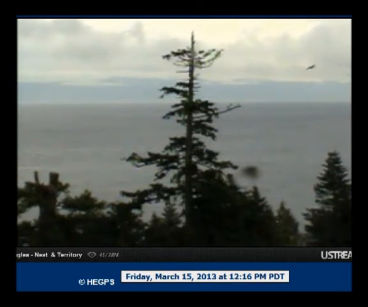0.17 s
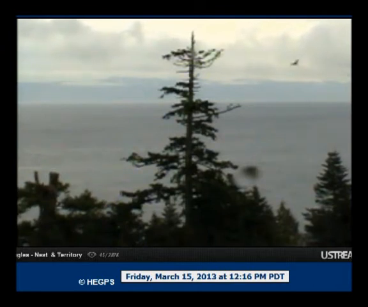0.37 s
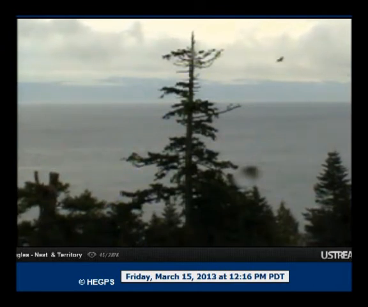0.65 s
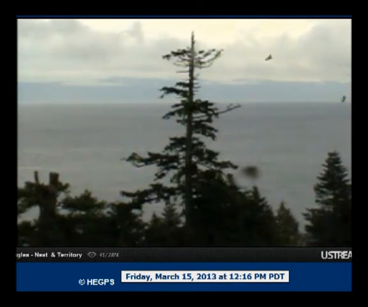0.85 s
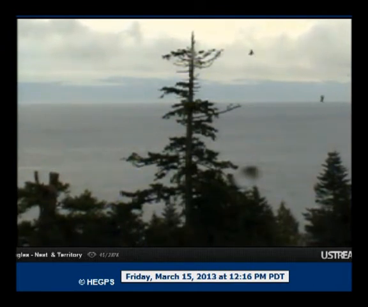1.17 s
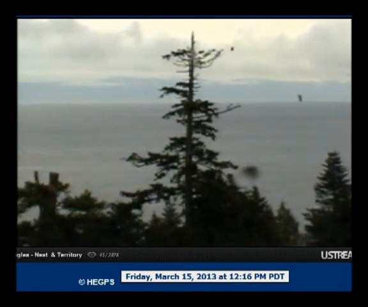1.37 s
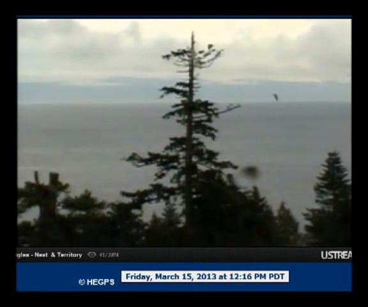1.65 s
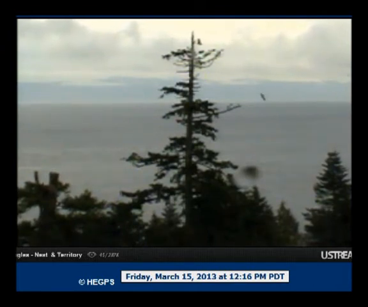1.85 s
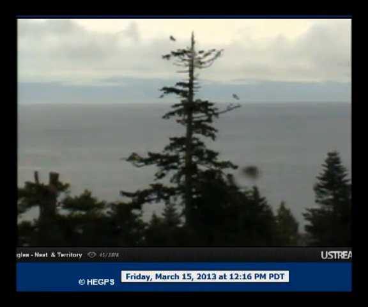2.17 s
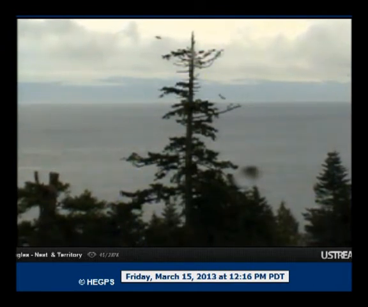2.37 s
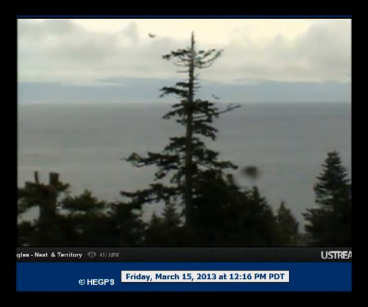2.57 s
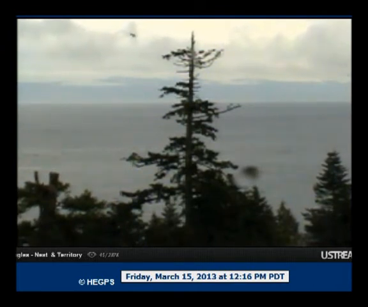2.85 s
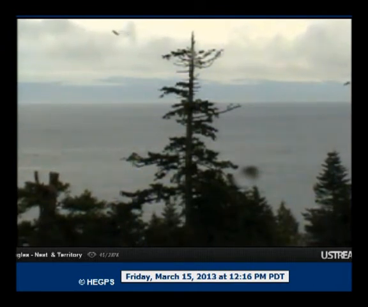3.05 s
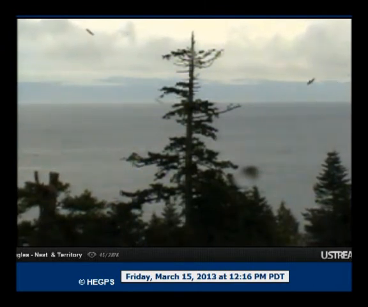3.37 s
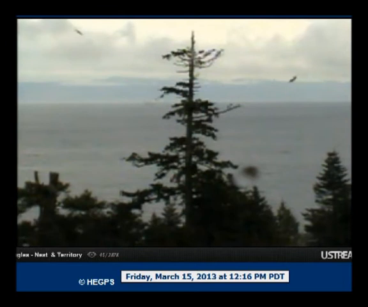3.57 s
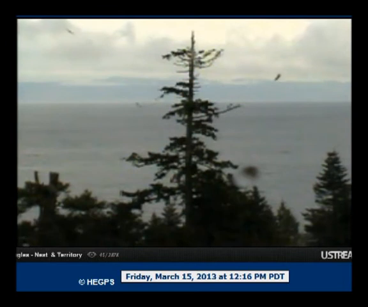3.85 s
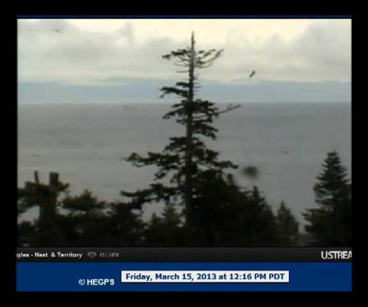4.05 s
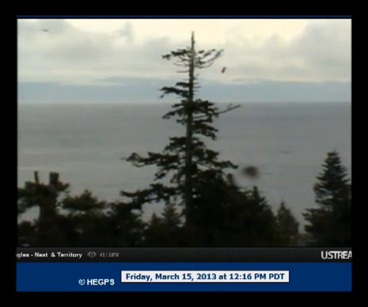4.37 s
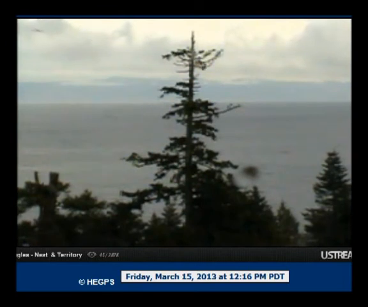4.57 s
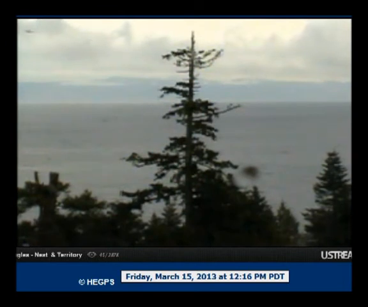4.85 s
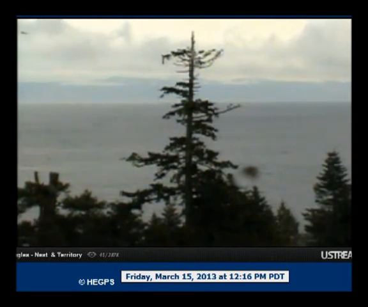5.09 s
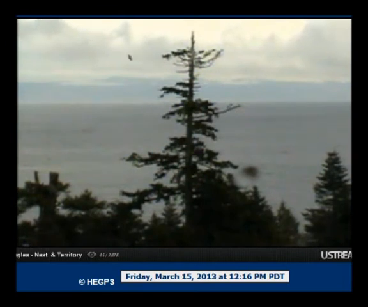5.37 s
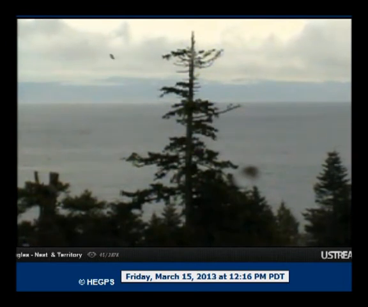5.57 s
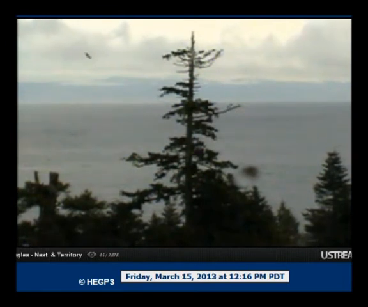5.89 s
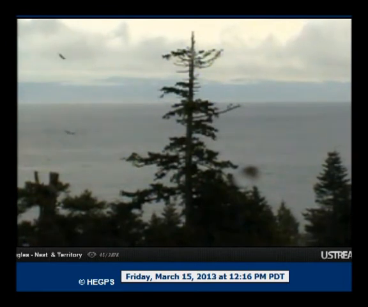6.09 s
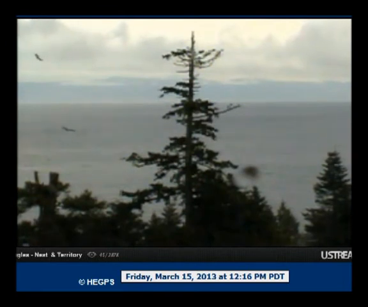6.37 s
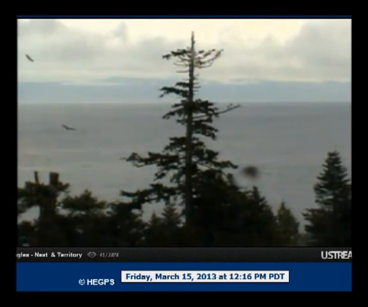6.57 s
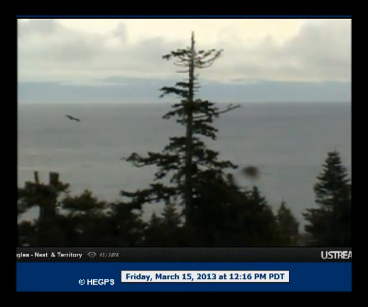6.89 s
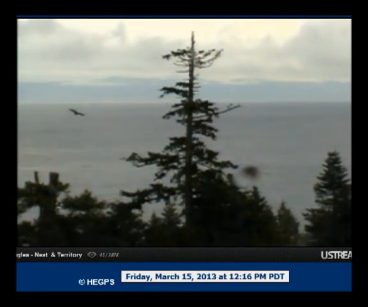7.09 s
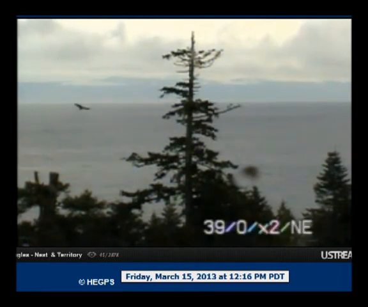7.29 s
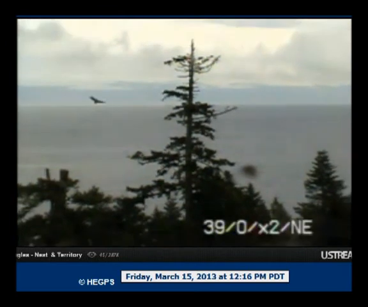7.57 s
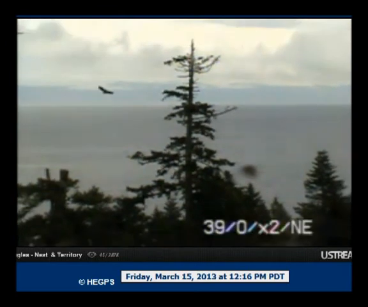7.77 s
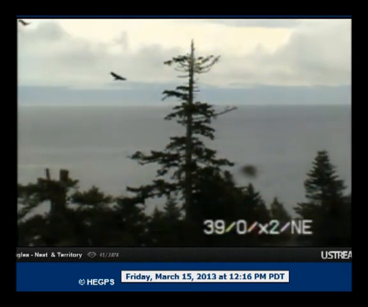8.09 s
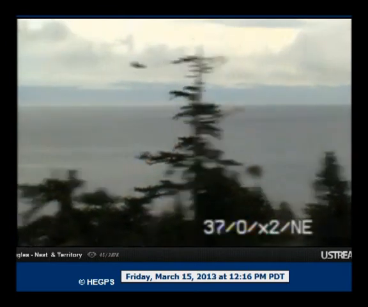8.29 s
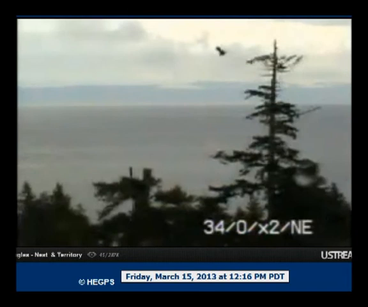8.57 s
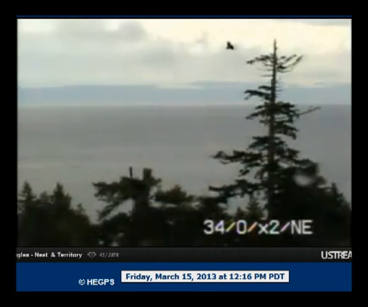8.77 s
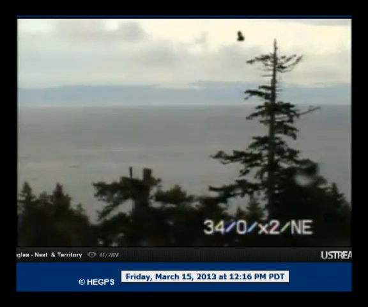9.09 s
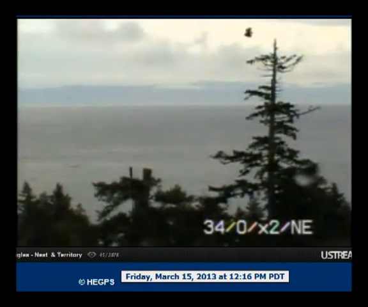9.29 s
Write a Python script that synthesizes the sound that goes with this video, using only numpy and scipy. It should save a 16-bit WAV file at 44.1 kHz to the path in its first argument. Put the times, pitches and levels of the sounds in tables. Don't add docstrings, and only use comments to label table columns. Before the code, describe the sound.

For the first three seconds there is only wind: a deep, fluttering boom in the camera housing, overloading the microphone, with surf and a rush in the trees that puffs up between 1 and 2 seconds. A very faint mains buzz lies beneath. From about 3 seconds eagles chatter in very short, high, nearly pure piped notes, mixed with yelps that scoop up, hold and crack downward. They are fairly faint at first, then stronger from 5 seconds, with loud notes near 5.9 and 6.9 and weak echoes off trunks. Wind buffeting peaks around 7 seconds, when the calls thin out. Near 8.2 a small motor whines, climbs in pitch and stops with a clunk at 8.7. Dense lower chirps follow until 9.4, over a faint, arched distant bird wail. The sound is gritty, with metallic mirrored tones and dull treble.

```python
import sys
import numpy as np
from scipy import signal
from scipy.fft import rfft, irfft, next_fast_len
from scipy.io import wavfile
from scipy.ndimage import uniform_filter1d

SR = 44100
rng = np.random.default_rng(int(sys.argv[2]) if len(sys.argv) > 2 else 0)


def put_to_file(sound):
    columns = np.atleast_2d(sound).T
    safe = np.clip(columns, -1, 1)
    whole_steps = np.round(safe * 32767)
    wavfile.write(sys.argv[1], SR, whole_steps.astype(np.int16))


def gain_from_db(level_db):
    decades = np.asarray(level_db, float) / 20
    return 10 ** decades


N = 415863
SURF_DB = -47.5


def rms_one(x):
    return x / np.sqrt(np.mean(x ** 2) + 1e-20)


def in_time(rows):
    s, *columns = np.transpose(rows)
    t = np.arange(N) / SR
    gate = (t >= s[0]) & (t <= s[-1])
    return [gate] + [np.interp(t, s, column) for column in columns]


def colour(x, points):
    size = next_fast_len(N)
    hz = np.arange(1, size // 2 + 2) * SR / size
    point_hz, point_db = np.transpose(points)
    gain_db = np.interp(np.log(hz), np.log(point_hz), point_db)
    return irfft(rfft(x, size) * gain_from_db(gain_db), size)[:N]


def drift(rate_hz):
    steps = rng.standard_normal(int(N / SR * 400) + 2)
    return rms_one(np.interp(np.arange(N) * rate_hz / SR, np.arange(len(steps)), steps))


def resonance(x, hz, width_hz):
    r = np.exp(-np.pi * width_hz / SR)
    poles = [1, -2 * r * np.cos(2 * np.pi * hz / SR), r * r]
    return signal.lfilter(np.array([1, 0, -1]) * (1 - r * r) / 2, poles, x)


def band(x, edges_hz):
    return signal.sosfilt(signal.butter(2, edges_hz, "band", fs=SR, output="sos"), x)


def whistle(hz, wobble):
    return 2 * np.pi * np.cumsum(hz * (1 + wobble * drift(60))) / SR


def eagle_notes():
    # centre t/s, peak level/dB, f/Hz,
    # glide/Hz, length/ms
    pipes = [(3.166, -47, 3500, -450, 14), (3.351, -37, 3800, -247, 11), (3.656, -36.5, 3738, -11.5, 25),
             (3.847, -38, 3530, -400, 15), (4.413, -41, 3922, -69, 15), (4.988, -34, 3600, 99, 12),
             (5.22, -29.5, 2984, 71, 19), (5.675, -43, 3340, -31, 13), (5.878, -24, 3660, -74, 17),
             (6.503, -46, 3860, -4, 14), (6.753, -43.5, 3410, -498, 15), (6.874, -21.5, 3110, 254, 30),
             (7.953, -50, 3491, -89, 8), (8.405, -26.5, 3125, 34, 23), (8.507, -29.5, 2930, -277, 9.8),
             (8.852, -44, 3124, 212, 14), (8.875, -33.5, 3375, -131, 17), (8.95, -46, 3410, -11, 110),
             (9.071, -30.5, 3620, -40, 18), (9.086, -29, 3430, -56, 19), (9.181, -30.5, 3490, -57, 18),
             (9.291, -28, 2970, -298, 16), (4.318, -49, 3400, -150, 10)]
    # centre t/s, peak level/dB, f/Hz, length/ms, level after the break/dB
    yelps = [(3.042, -39, 3937, 40, -47), (3.251, -48, 3900, 32, -46.5), (3.751, -36, 3800, 22, -41),
             (4.198, -38.5, 3935, 46, -47), (4.551, -37, 3839, 26, -40), (4.970, -27, 3725, 11, -27),
             (5.082, -32.5, 3700, 13, -24), (5.776, -32.5, 3807, 23, -40), (5.969, -30.5, 3620, 9.8, -42.5),
             (6.411, -39, 3980, 14, -29), (6.525, -42.5, 4020, 22, -33.5), (6.623, -40.5, 3890, 36, -40),
             (7.001, -31.5, 3790, 24, -32), (7.121, -28.5, 3740, 14, -43), (7.830, -36.5, 3905, 39, -50),
             (8.051, -40, 3920, 31, -43), (8.17, -44.5, 3900, 31, -42.5), (8.290, -33, 3890, 11, -29.5),
             (9.407, -28.5, 3195, 12, -28)]
    scoop_pitch, scoop_rise_hz, scoop_ms = .81, 350, 9
    break_pitch, break_ms, break_late_ms = .865, 15, 6.8
    rows = list(pipes)
    for s, db, hz, ms, low_db in yelps:
        half_s = ms / 2 / 1000
        scoop_db = min(db - 3.5, -41.5)
        low_glide_hz = 60 + 20.5 * (low_db + 28.5)
        rows.append((s - half_s, scoop_db, scoop_pitch * hz, scoop_rise_hz, scoop_ms))
        rows.append((s, db, hz, -79.5, ms))
        rows.append((s + half_s + break_late_ms / 1000, low_db, break_pitch * hz, low_glide_hz, break_ms))
    return rows


def eagles():
    # lag t/s, level/dB
    trunks = [(.027, -26.5), (.05, -24.5), (.074, -25.5), (.11, -25.5)]
    calls, waver = np.zeros(N + SR), drift(200)
    flutter = gain_from_db(4.5 * np.minimum(drift(260), .6))
    rasp = drift(390) * np.cos(2 * np.pi * 280 * np.arange(N) / SR)
    for s, db, hz, glide_hz, ms in eagle_notes():
        size = int(1.3 * ms * SR / 1000)
        start = int(s * SR - .45 * size)
        u = np.linspace(0, 1, size)
        here = np.minimum(np.arange(start, start + size), N - 1)
        pitch_hz = (hz + 1.3 * glide_hz * (u - .45)) * (1 + .01 * waver[here])
        phase = 2 * np.pi * np.cumsum(pitch_hz) / SR
        swell = np.sin(np.pi * u ** .64) * flutter[here]
        tone = np.sin(phase) + gain_from_db(-37) * np.sin(2 * phase)
        hoarse = 1 + 1.3 * max(hz - 3400, 0) / 1000 * rasp[here]
        calls[start:start + size] += gain_from_db(db - 0.5) * swell * tone * hoarse
    lag = np.arange(SR // 2) / SR
    scatter = rng.standard_normal(len(lag)) * gain_from_db(-60 * lag / .8) * (lag > .012)
    echoes = signal.fftconvolve(calls, scatter / np.sqrt(np.sum(scatter ** 2)))
    near = sum(gain_from_db(db) * np.roll(calls, int(s * SR)) for s, db in trunks)
    return calls[:N] + flutter * (gain_from_db(-20.5) * echoes[:N] + near[:N])


def gusts():
    # peak t/s, level over the surf/dB, fall/s
    gust_table = [
        (.2, -1.5, 0.31),
        (1.05, 1, .3),
        (1.37, 4, 0.12),
        (1.62, 2, 0.087),
        (1.97, 3.5, 0.12),
        (2.57, 0.5, 0.1),
        (5.51, 2, 0.049),
        (6.9, 0.5, 0.28),
        (9.2, 0, 0.12),
    ]
    t, rush_db = np.arange(N) / SR, np.full(N, float(SURF_DB))
    for s, db, fall in gust_table:
        spread = np.where(t < s, 0.38 * fall, fall)
        rush_db += db * np.exp(-((t - s) / spread) ** 2)
    return rush_db


def wind():
    # t/s, buffeting level/dB
    pressure = [(0, -29), (.5, -28.5), (1.2, -29.5), (2.5, -27), (3.3, -31.5), (4.4, -25), (4.8, -27),
                (5.2, -22), (6.3, -25.5), (6.7, -22.5), (7.15, -19.5), (7.5, -27), (8.6, -30.5), (9.2, -26),
                (9.43, -26)]
    # f/Hz, width/Hz, level/dB
    housing = [(55.5, 23.7, -6), (83.26, 8.3, -6), (126.82, 13.37, 4.5), (148.6, 8.2, -9.5),
               (196.1, 14.8, -11), (264.5, 19.3, -13.5), (336.5, 34.9, -11), (399, 10, -29.5),
               (581.6, 43.6, -22), (813.5, 70, -29), (1050, 68, -34)]
    # f/Hz, level per Hz/dB
    rush_colour = [(150, 6.5), (400, -4.5), (700, -4), (1400, -8), (2000, -15), (2500, -19), (3000, -24.5),
                   (3600, -33.5), (3900, -51.5), (6000, -55.5), (9000, -62.5)]
    _, buffet_db = in_time(pressure)
    boom_db = -18 - 0.039 * (buffet_db - buffet_db.mean())
    rush_db = gusts()
    air = rng.standard_normal((len(housing) + 2, N + SR))
    boom = np.zeros(N + SR)
    for a, (hz, width_hz, db) in zip(air, housing):
        boom += gain_from_db(db) * resonance(resonance(a, hz, width_hz), hz, 6 * width_hz)
    boom = gain_from_db(boom_db + 3.0) * rms_one(boom[SR:])
    buffet = gain_from_db(buffet_db + 0.5) * rms_one(band(air[-1], [14, 70])[SR:])
    rush = colour(air[-2, :N], rush_colour) * gain_from_db(0.56 * drift(12))
    leaves = band(rush, (1300, 2400))
    rush = rush + (gain_from_db(1.3 * (rush_db - SURF_DB)) - 1) * leaves
    return boom + buffet + gain_from_db(.6 * rush_db - 4.0) * rms_one(rush)


def motor():
    # t/s, f/Hz, level/dB
    pan = [
        (8.22, 1175, -60),
        (8.26, 1187, -40),
        (8.3, 1195, -56),
        (8.34, 1198, -43.5),
        (8.42, 1187, -60),
        (8.49, 1228, -38.5),
        (8.64, 1302, -30),
        (8.665, 1340, -45),
        (8.675, 1305, -47),
    ]
    stop_s, stop_db = 8.685, -27.5
    gate, hz, db = in_time(pan)
    whine = gate * gain_from_db(db + 2.5) * np.sin(whistle(hz, wobble=.003))
    since = np.arange(N) / SR - stop_s
    knock = rng.standard_normal(N) * (since > 0) * np.exp(-np.abs(since) / 0.018)
    gearbox = resonance(resonance(knock, 1200, 500), 1200, 500)
    return whine + gain_from_db(stop_db) * 6 * gearbox


def far_birds():
    # t/s, f/Hz, fundamental level/dB, octave level/dB
    wail_arch = [(9.0, 1200, -55, -68), (9.038, 1300, -39, -63), (9.105, 1385, -45, -52),
                 (9.16, 1450, -46, -61), (9.24, 1485, -50, -57), (9.3, 1490, -49, -60),
                 (9.328, 1470, -46, -46), (9.352, 1300, -42, -45), (9.39, 1200, -54, -66)]
    # t/s, f/Hz, level/dB
    answer_arch = [(9.13, 2330, -66), (9.16, 2390, -55), (9.24, 2400, -57), (9.28, 2310, -51),
                   (9.325, 2150, -51), (9.35, 2050, -68)]
    gate, hz, db, octave_db = in_time(wail_arch)
    phase = whistle(hz, wobble=0.0031)
    wail = gate * (gain_from_db(db) * np.sin(phase) + gain_from_db(octave_db) * np.sin(2 * phase))
    gate, hz, db = in_time(answer_arch)
    answer = gate * gain_from_db(db) * np.sin(whistle(hz, wobble=0.0025))
    shimmer = gain_from_db(2.5 + 2 * drift(30))
    return shimmer * (wail + answer)


def mains_buzz():
    mains_hz = 60
    spikes = np.zeros(N)
    at = (np.arange(0, N / SR, .5 / mains_hz) * SR).astype(int)
    spikes[at] = (-1.) ** np.arange(len(at))
    return gain_from_db(-62) * rms_one(resonance(resonance(spikes, 2900, 1400), 2900, 1400))


def scene():
    return (eagles() + wind() + motor() + far_birds() + mains_buzz())[None]


def overload(x):
    ceiling, knee, give = .3, .234, .17
    x = np.minimum(x, ceiling)
    return np.maximum(x, give * (x + knee) - knee)


def unsteady_clock(x):
    # f/Hz, timing error level in samples/dB, f above which its mirror fades/Hz
    wobbles = [(3900, -10, 9000), (7800, -14.5, 2200)]
    t, slope = np.arange(N) / SR, np.gradient(x)
    for hz, db, fade_hz in wobbles:
        dull = signal.sosfilt(signal.butter(3, fade_hz, fs=SR, output="sos"), slope)
        x = x + gain_from_db(db) * np.cos(2 * np.pi * hz * t) * dull
    return x


def patchy_treble(x):
    # f/Hz, level over its usual level/dB
    shut_under = [(4400, -7), (8600, -6), (9100, -1), (9600, 3), (9900, 11), (12000, 23), (12500, 60)]
    hz, _, z = signal.stft(x, SR, nperseg=1024)
    power = uniform_filter1d(np.abs(z) ** 2, size=9, axis=0)
    power = power[4::9].repeat(9, axis=0)[:len(hz)]
    limit = np.median(power, axis=1) * gain_from_db(2 * np.interp(hz, *np.transpose(shut_under), left=-90))
    masked = gain_from_db(2 * -27) * ((hz > 4400) & (hz < 5800))
    high = np.max(power[(hz > 3550) & (hz < 4200)], axis=0)
    ahead = np.maximum(high, np.roll(high, -2) * gain_from_db(-4))
    note_power = np.max(power[(hz > 2700) & (hz < 4200)], axis=0)
    grit = rng.standard_normal(z.shape) + 1j * rng.standard_normal(z.shape)
    z = z + gain_from_db(-20.5) * np.outer((hz > 2800) & (hz < 4330), np.sqrt(note_power)) * grit
    opened = power > limit[:, None] + masked[:, None] * ahead
    opened = np.maximum(opened, .22 * (hz < 8000)[:, None])
    return signal.istft(z * opened, SR, nperseg=1024)[1][:N]


def top_cut(x):
    return signal.sosfilt(signal.butter(12, 12600, fs=SR, output="sos"), x)


def record(dry):
    # f/Hz, level/dB
    treble_loss = [(7000, -1.1), (8400, -2), (9300, -4), (10000, -12), (12000, -14)]
    x = unsteady_clock(overload(dry[0]))
    x = patchy_treble(colour(x, [(4500, 0)] + treble_loss))
    return top_cut(x[None])


dry = scene()
out = record(dry)
put_to_file(out)
```